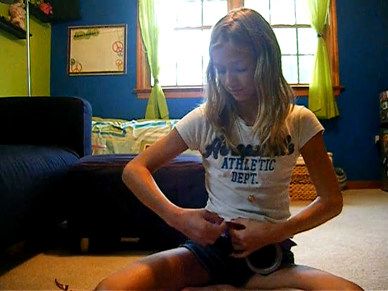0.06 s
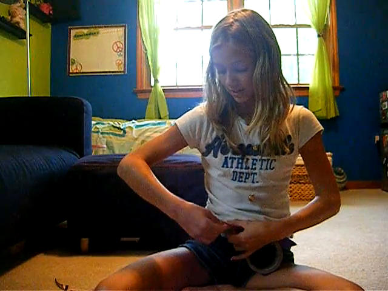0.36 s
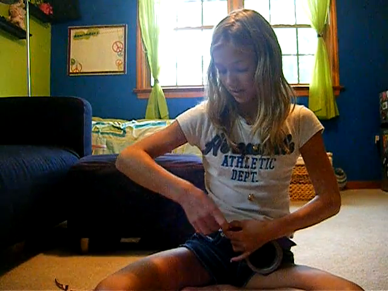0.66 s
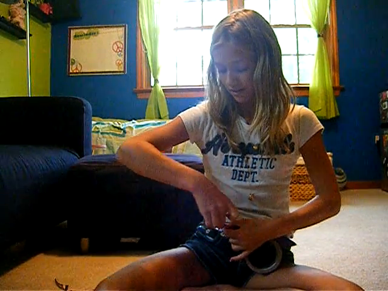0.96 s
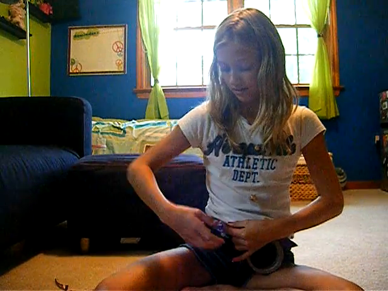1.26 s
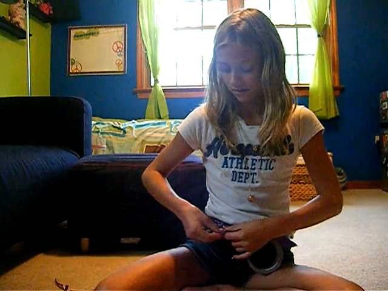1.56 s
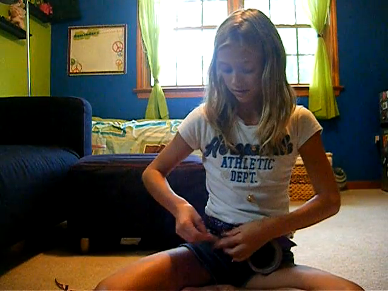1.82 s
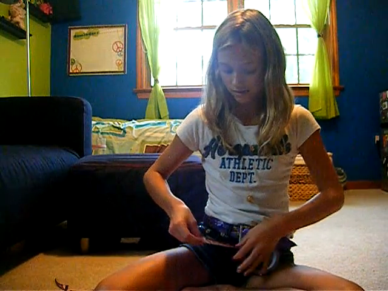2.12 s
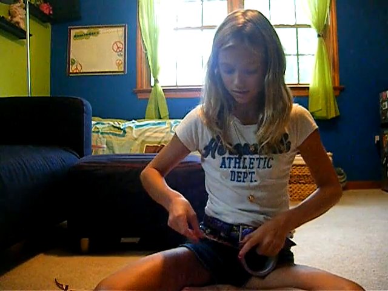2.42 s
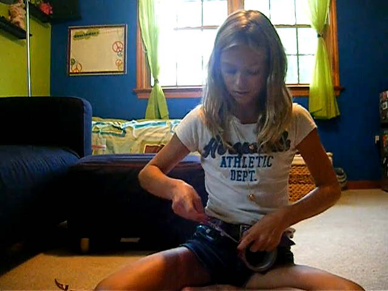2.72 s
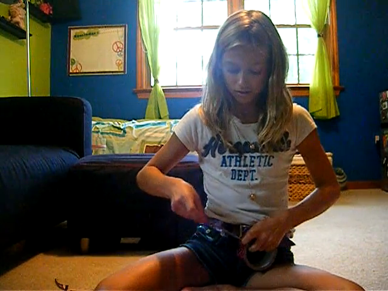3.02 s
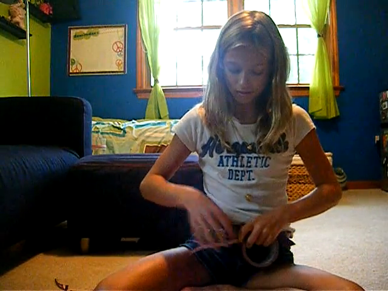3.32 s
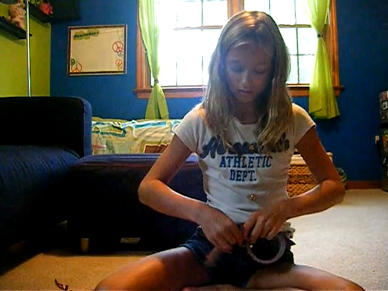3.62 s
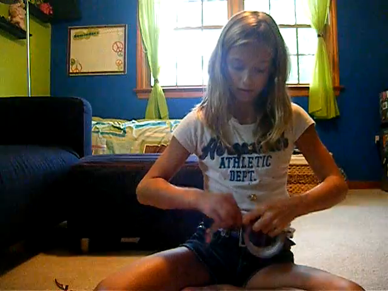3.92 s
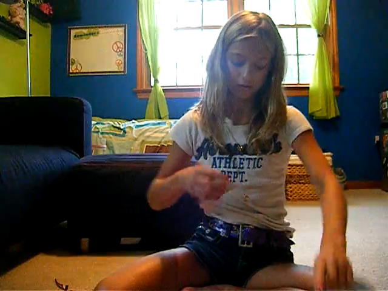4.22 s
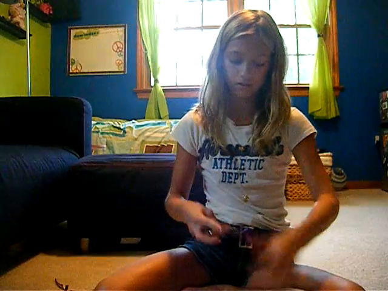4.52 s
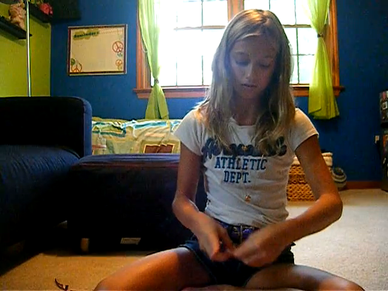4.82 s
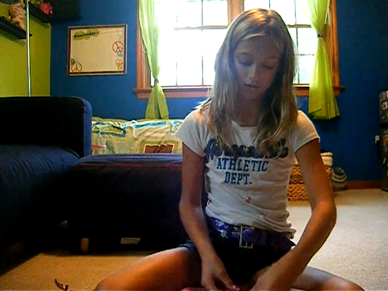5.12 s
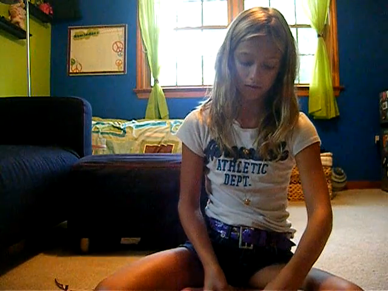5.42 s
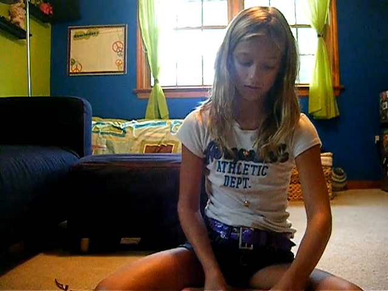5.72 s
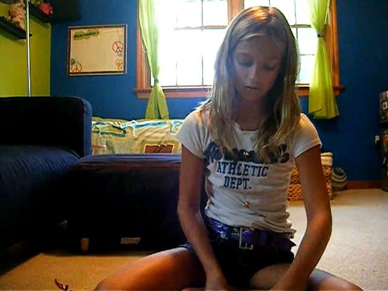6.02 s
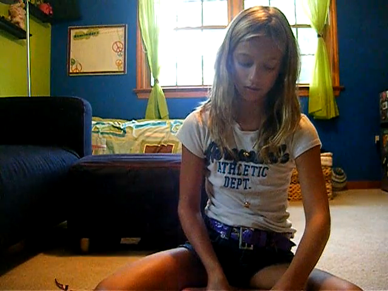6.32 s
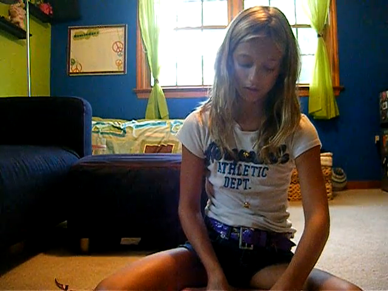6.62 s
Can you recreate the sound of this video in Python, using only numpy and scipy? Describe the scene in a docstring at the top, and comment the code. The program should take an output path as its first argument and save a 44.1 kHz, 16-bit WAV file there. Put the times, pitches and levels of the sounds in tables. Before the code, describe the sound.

In a small carpeted room with a faint steady hum and hiss, someone handles duct tape, making scattered clicks, crackles and sharp snaps. A few brief, soft peels lead to a single short rip, followed by the dull thud of the roll being put down. Fingers faintly smooth the tape as the clicks thin out. Everything sounds slightly dull through a microphone a metre or two away.

```python
"""Sharp clicks, a soft fizzing peel and one short rip: duct tape handled in a small carpeted room.
The stiff strip clicks as it buckles, fizzes as its glue lets go and rips as its cloth threads part.
Fingers smooth it down and the roll thuds on the carpet, over a faint motor hum and hiss.
A small narrow-band microphone, a metre or two away, dulls the top."""
import sys
import numpy as np
from scipy import signal
from scipy.fft import rfft, irfft, next_fast_len
from scipy.io import wavfile
from scipy.ndimage import uniform_filter1d

SR = 44100
rng = np.random.default_rng(int(sys.argv[2]) if len(sys.argv) > 2 else 0)


def materialize(psi):
    """Save the field psi as 16-bit PCM at rate SR to the path in sys.argv[1].

    A 1-D psi becomes a single channel; in a 2-D psi each row is a channel.
    """
    bounded = np.clip(np.atleast_2d(psi).T, -1, 1)
    quanta = np.round(bounded * 32767).astype(np.int16)
    wavfile.write(sys.argv[1], SR, quanta)


N = 302526
T = np.arange(N) / SR
TOP_HZ = 6750  # upper edge of the band


def undb(db):
    """Decibels to gain."""
    return 10 ** (np.asarray(db) / 20)


def unit(x):
    """Scale to rms 1."""
    return x / np.sqrt(np.mean(x ** 2))


def fade(t, t60):
    """Exponential decay that has lost 60 dB at t60."""
    return np.exp(-np.log(1000) * t / t60)


def colour(x, points):
    """Equalise along a curve of (f/Hz, gain/dB) points."""
    hz, db = np.transpose(points)
    size = next_fast_len(2 * len(x))
    f = np.maximum(np.fft.rfftfreq(size, 1 / SR), 1)
    gain = undb(np.interp(np.log(f), np.log(hz), db))
    return irfft(rfft(x, size) * gain, size)[:len(x)]


def resonate(x, hz, width_hz):
    """Two-pole resonance, gain 1 at the centre."""
    return signal.lfilter(*signal.iirpeak(hz, hz / width_hz, fs=SR), x)


def walk(rate):
    """Smooth random wander with a spread near 1, turning rate times a second."""
    step = int(SR / rate)
    return uniform_filter1d(np.repeat(rng.standard_normal(N // step + 1), step), step)[:N]


def crackle(rate, spread_db):
    """Tiny snaps at random moments, about rate a second, rms 1."""
    hit = rng.random(N) < rate / SR
    size = undb(spread_db * np.clip(rng.standard_normal(N), -2, 2))
    return unit(hit * size * rng.choice([-1, 1], N))


def add(out, s, sound):
    """Mix a sound in at time s."""
    i = int(s * SR)
    out[i:i + len(sound)] += sound[:N - i]


def background(hiss_db, hum_hz, hum_db, waver_rad):
    """The bed: steady hiss and the harmonics of a slightly wavering motor hum."""
    # spectrum of the hiss: f/Hz, relative level/dB
    hiss_colour = [(30, -12.5), (90, -14.5), (145, -11.5), (220, -10), (290, -4), (345, 2), (400, -2),
                   (500, -4.5), (750, -10), (1400, -11), (3000, -13), (5000, -14.5), (5800, -22),
                   (6700, -44.5)]
    # motor harmonics: multiple of hum_hz, relative level/dB
    harmonics = [(2, -62), (3, -59), (4, -72.5), (6, -71), (8, -66), (10, -68.5)]
    hiss = unit(colour(rng.standard_normal(N), hiss_colour)) * undb(hiss_db + 0.16 * walk(3.7))
    phase = 2 * np.pi * hum_hz * T + waver_rad * walk(5.9)
    hum = sum(undb(db) * np.sqrt(2) * np.sin(k * phase + 2 * np.pi * rng.random())
              for k, db in harmonics)
    return hiss + undb(hum_db) * hum


def room(x, wet_db, early_db=-7, early_t60=0.21, late_db=-10, late_t60=0.34):
    """Direct sound, a few near echoes, quick scatter off the furniture and a short tail."""
    # echoes off nearby surfaces: delay/s, relative level/dB
    echoes = [(.0033, -32.5), (0.0082, -19.5), (0.014, -19)]
    # tone of the scatter and tail: f/Hz, gain/dB
    room_colour = [(150, -10), (800, -6), (2000, -1), (4000, -4.5), (6500, -4.5)]
    t = np.arange(SR // 2) / SR
    early, late = rng.standard_normal((2, len(t))) * (1 - np.exp(-t / 0.004))
    early, late = early * fade(t, early_t60), late * fade(t, late_t60)
    diffuse = undb(early_db) * early / np.linalg.norm(early) + undb(late_db) * late / np.linalg.norm(late)
    response = colour(diffuse, room_colour)
    for s, db in echoes:
        response[int(s * SR)] += undb(db)
    return x + undb(wet_db) * signal.fftconvolve(x, response)[:N]


def rubs(slip_rate, spread_db):
    """Short, faint rasps: skin catches and slips on the cloth backing."""
    # fingers smoothing the tape down: middle t/s, half length/s, level/dB, centre f/Hz
    strokes = [(.56, .1, -56, 4500), (1.113, 0.0089, -54, 5000), (1.771, 0.013, -47.5, 4700),
               (2.811, 0.033, -48, 2510), (5.029, 0.027, -45, 4700), (5.568, 0.0084, -49, 4170),
               (6.083, 0.0074, -46.5, 3800)]
    out = np.zeros(N)
    slips = crackle(slip_rate, spread_db)
    for s, half_s, db, hz in strokes:
        width_hz = 0.51 * hz
        rasp = resonate(resonate(slips, hz, width_hz), hz, width_hz)
        swell = np.exp(-((T - s) / half_s) ** 2 / 2)
        out += unit(rasp) * undb(db) * swell
    return out


def roll(land_s, level_db):
    """A dull thud: the heavy roll lands on the carpet, which softens the contact."""
    # modes of the landing roll: f/Hz, relative level/dB, t60/s
    modes = [(140, -6, .06), (244, 0, 0.081), (375, -5.5, 0.077), (500, -5, 0.083)]
    out, t = np.zeros(N), np.arange(SR // 3) / SR
    ring = sum(undb(db) * np.sin(2 * np.pi * hz * t) * fade(t, t60) for hz, db, t60 in modes)
    soft_attack = 1 - np.exp(-t / 0.0015)
    add(out, land_s, undb(level_db) * ring * soft_attack)
    return out


def peel(attack_s, swell_db, release_t60, flutter_db):
    """Glue strands part in a soft fizz that swells as each pull quickens and dies when the hand stops."""
    # pulls that draw tape off the roll: start t/s, length/s, end level/dB
    pulls = [(1.99, 0.058, -43.5), (2.17, .07, -53), (2.87, .26, -43.5), (3.216, 0.2, -51),
             (3.928, 0.084, -43.5), (4.1, .08, -54)]
    # spectrum of the parting glue: f/Hz, relative level/dB
    peel_colour = [(300, -25), (900, -9.5), (1700, -6), (2050, 4.5), (2400, 2.5), (2900, -6.5), (4200, -1),
                   (5300, -1), (6000, -8), (6900, -22.5)]
    envelope = np.zeros(N)
    for start, length, db in pulls:
        grip = np.clip((T - start) / attack_s, 0, 1)
        to_go = np.clip(1 - (T - start) / length, 0, 1)
        release = fade(np.maximum(T - start - length, 0), release_t60)
        envelope += grip * undb(db - swell_db * to_go) * release
    fizz = unit(colour(crackle(rate=1300, spread_db=0), peel_colour))
    return fizz * envelope * undb(flutter_db * walk(60))


def snap(hz, width_hz, broad_db, spread_s):
    """One sudden release, peak 1: a broad tick with a hump at its pitch."""
    f = np.fft.rfftfreq(512, 1 / SR)
    hump = np.exp(-((f - hz) / width_hz) ** 2)
    bass_cut = f ** 2 / (f ** 2 + 1000 ** 2)  # a narrow strip radiates little bass
    broad = undb(broad_db) * bass_cut / (1 + (f / TOP_HZ) ** 20)
    delay = .0005 + spread_s * np.maximum(1 - f / TOP_HZ, 0)  # in a thin sheet the highs arrive first
    phase = -2 * np.pi * np.cumsum(delay) * f[1]
    wave = irfft((hump + broad) * np.exp(1j * phase))[:SR // 200]
    return wave / np.abs(wave).max()


def creases(snap_db, ring_db, ring_cycles, flap_db, flap_t60,
            crinkle_db, crinkle_t60, strain_db, strain_t60):
    """The stiff strip crinkles under strain, snaps over and rings, springs back, crinkles on and flaps."""
    # the strip buckling: t/s, relative level/dB, snap f/Hz, flap offset/dB
    buckles = [(0.369, -33, 2600, -17), (.432, -31, 4120, -23), (.512, -36, 2000, -5.5),
               (0.6371, -9, 4810, -15.5), (1.036, -25.5, 4800, -13), (1.335, -31, 5190, -17),
               (1.3409, -13, 5190, -32), (1.836, -29, 2120, -12.5), (1.855, -33, 2360, -13),
               (2.022, -23.5, 2190, -26), (2.063, -33.5, 4600, -8), (2.0859, -9.5, 4200, -20.5),
               (2.192, -34.5, 2260, -10), (2.2507, -11.5, 5060, -16), (2.574, -36, 5100, -16),
               (3.305, -36.5, 3830, -13), (3.354, -32, 4150, -12), (3.386, -24, 2530, -14),
               (3.969, -26.5, 4730, -19), (4.004, -22.5, 4700, -37.5), (4.109, -28.5, 2170, -31),
               (4.468, -31.5, 5200, -38), (4.501, -35, 2770, -30), (4.658, -21, 4570, -16),
               (5.034, -22, 3180, -21.5), (5.174, -23.5, 5000, -33), (5.315, -30, 4400, -35),
               (5.519, -29.5, 3800, -32), (5.763, -36.5, 4970, -30)]
    # modes of the stretched strip: multiple of its pitch, width/Hz, gain/dB
    modes = [(.28, 70, -8.5), (0.621, 70, -0.5), (0.999, 118, 0.5), (1.279, 131, -5), (1.85, 158.5, -4.5),
             (2.4, 246, -15)]
    # spectrum of the crinkle: f/Hz, relative level/dB
    crinkle_colour = [(200, -25), (1000, -6.5), (2200, 4.5), (3800, 11.5), (5700, 7), (7000, -31)]
    out, crinkle_envelope = np.zeros((2, N))
    t = np.arange(SR // 6) / SR
    for s, db, hz, loose_db in buckles:
        click = snap(hz, width_hz=0.18 * hz, broad_db=-13, spread_s=0.002015)
        add(out, s, undb(db + snap_db) * click)
        ring = np.sin(2 * np.pi * hz * t) * (1 - np.exp(-t / 0.0025)) * fade(t, ring_cycles / hz)
        add(out, s, undb(db + ring_db) * ring)
        # the crease springs back with a second, weaker click
        rebound = snap(hz=4600, width_hz=740, broad_db=-10.5, spread_s=0.0027)
        add(out, s + .011, undb(0.68 * db - 15.5) * rebound)
        # soft creases are looser: their crinkle shrinks less than their snap
        crinkle_level = undb(0.8 * db + crinkle_db)
        build_up = undb(strain_db) * fade(t, strain_t60)[::-1]
        add(crinkle_envelope, s - t[-1], crinkle_level * build_up)
        add(crinkle_envelope, s, crinkle_level * fade(t, crinkle_t60))
        shake = rng.standard_normal(len(t)) * fade(t, flap_t60)
        shake[0] += 10  # the jolt of the snap itself
        strip_hz = 706 + 80.5 * s  # climbs as more is stuck down and the free length shrinks
        flap = sum(undb(mode_db) * resonate(shake, k * strip_hz, width) for k, width, mode_db in modes)
        add(out, s, undb(db + loose_db + flap_db) * flap)
    crinkle = unit(colour(crackle(rate=2600, spread_db=7), crinkle_colour))
    return out + crinkle_envelope * crinkle


def rip(thread_db, stop_s):
    """The cloth backing tears: a hail of fibres, the strong threads standing out, then a sudden stop."""
    # envelope of the tear running across the strip: t/s, level/dB
    tear = [(4.197, -28), (4.208, -15.5), (4.228, -12), (4.245, -16.5), (4.256, -10)]
    # spectrum of the breaking fibres: f/Hz, relative level/dB
    tear_colour = [(100, -59), (400, -33.5), (680, -17.5), (850, -16), (1300, -14.5), (1900, -5.5),
                   (2600, -7), (3400, -0.5), (4400, -6.5), (5400, -9.5), (6200, -16), (6900, -34)]
    # single strong threads parting: t/s, relative peak level/dB, f/Hz
    threads = [(4.1826, -22, 3400), (4.194, -17.5, 3500), (4.2052, -4, 4340), (4.2131, -1.5, 4200),
               (4.2175, 0, 4120), (4.2236, 0.5, 4540), (4.2537, -17, 3100)]
    times, levels_db = np.transpose(tear)
    gate = (T > times[0]) * np.clip((times[-1] - T) / stop_s + .5, 0, 1)
    fibres = unit(colour(crackle(rate=3200, spread_db=2.0), tear_colour))
    out = fibres * undb(np.interp(T, times, levels_db)) * gate
    for s, db, hz in threads:
        add(out, s, undb(db + thread_db) * snap(hz, width_hz=760, broad_db=-15.5, spread_s=.003))
    return out


def scene():
    """Tape sounds in the room, dulled at the top by the microphone, over the bed of hum and hiss."""
    clicks = creases(snap_db=1.24, ring_db=-11.5, ring_cycles=75, flap_db=12, flap_t60=0.18,
                     crinkle_db=-20.0, crinkle_t60=0.092, strain_db=-1.5, strain_t60=0.018)
    handling = rip(thread_db=2.5, stop_s=.002)
    handling += peel(attack_s=.007, swell_db=9, release_t60=0.37, flutter_db=2.5)
    handling += rubs(slip_rate=1500, spread_db=8.5)
    handling += roll(land_s=4.648, level_db=-31)
    # the clicks face the microphone and carry less of the room
    tape = room(clicks, wet_db=-2.5) + room(handling, wet_db=-1.5)
    dulled = signal.sosfilt(signal.butter(N=12, Wn=6100, fs=SR, output="sos"), tape)
    bed = background(hiss_db=-48, hum_hz=59.4, hum_db=-2, waver_rad=0.055)
    return (dulled + bed)[None]


def record(dry):
    """The loudest peaks are clipped and the treble is cut steeply."""
    clipped = np.clip(dry, -.83, .83)
    return signal.sosfilt(signal.ellip(9, .2, 80, TOP_HZ, fs=SR, output="sos"), clipped)


dry = scene()
out = record(dry)
materialize(out)
```